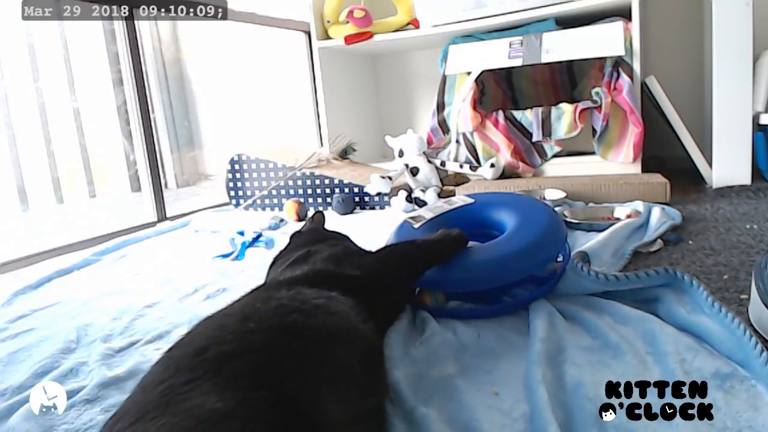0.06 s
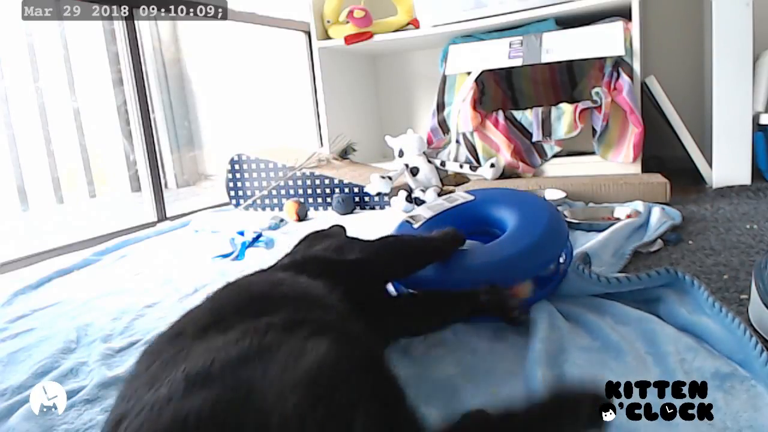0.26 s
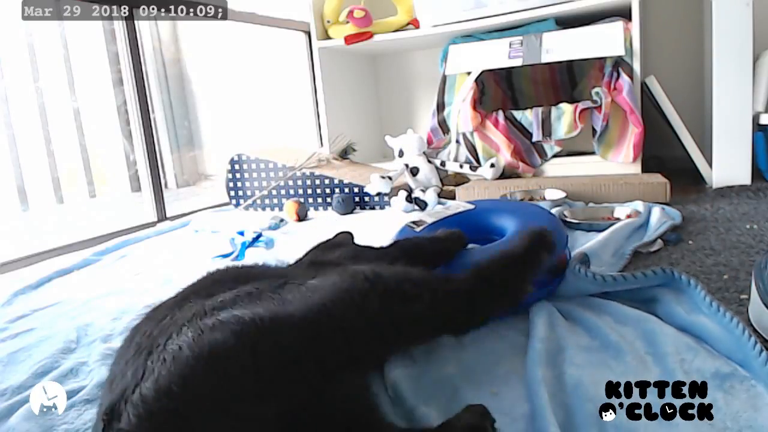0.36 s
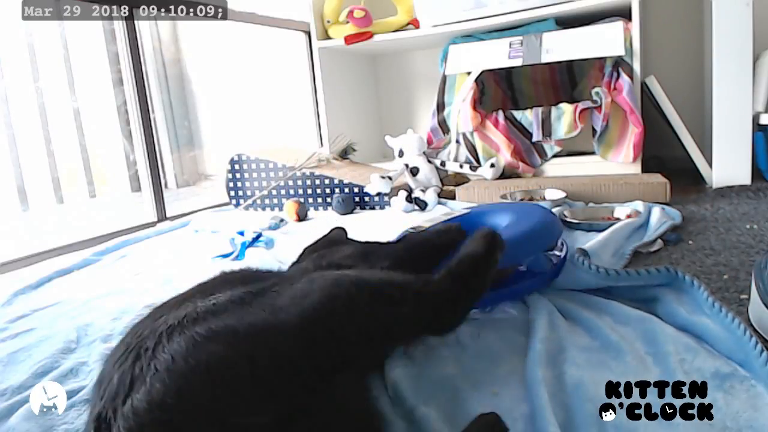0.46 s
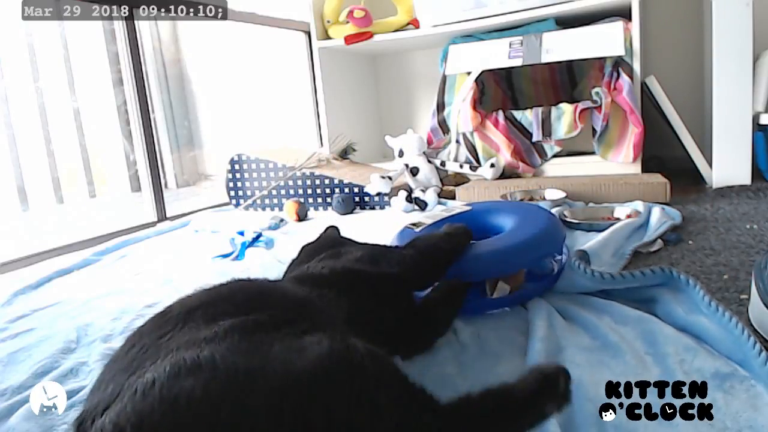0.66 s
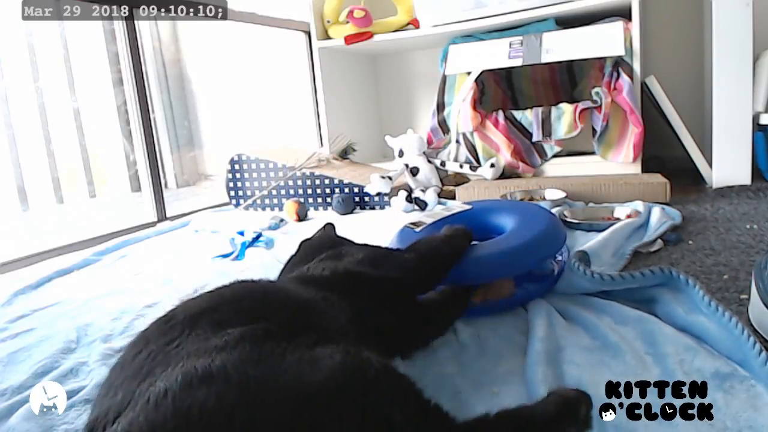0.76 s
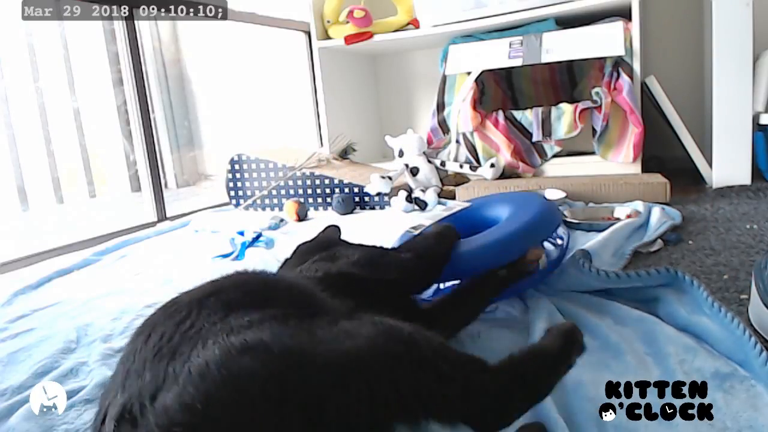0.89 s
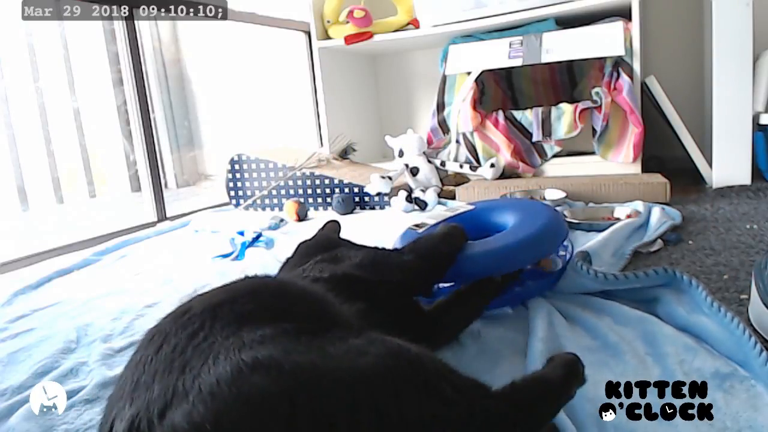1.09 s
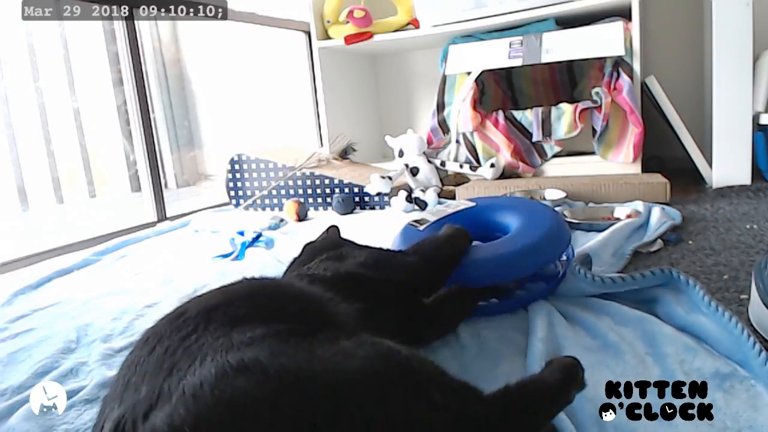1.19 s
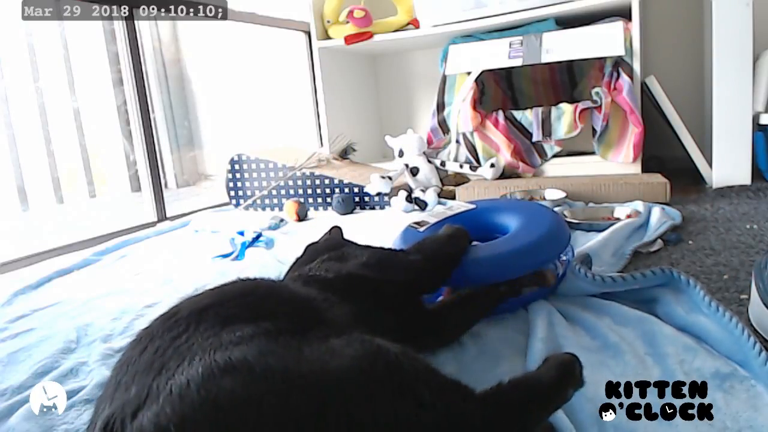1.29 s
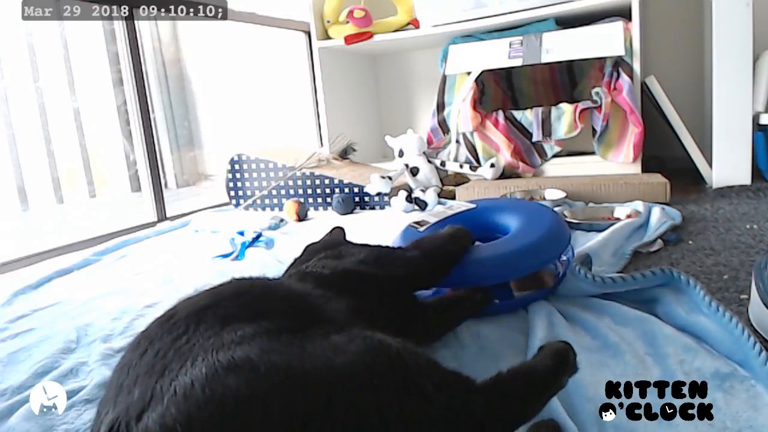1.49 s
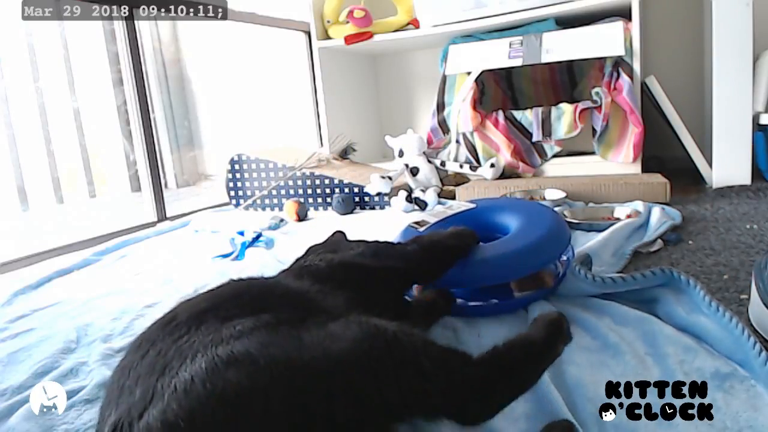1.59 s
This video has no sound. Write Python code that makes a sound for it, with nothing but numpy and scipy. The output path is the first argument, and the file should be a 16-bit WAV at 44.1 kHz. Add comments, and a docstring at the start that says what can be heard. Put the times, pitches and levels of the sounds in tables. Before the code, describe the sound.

A cat paws a plastic track toy in a small room, making the ball roll, rattle and click between light hollow knocks. The clatter eases toward the end, sitting slightly to the right over faint hiss and hum.

```python
"""A small room, where a cat on a blanket bats a hollow plastic ring with a ball in its track.
The ball clicks against the track walls and rolls with a rumble and a rattle; paws thump the shell
and set it ringing, and the room answers with a short tail. Underneath lie hiss, a machine's hum
and a thin whine from the wiring. All but the whine is louder on the right."""
import sys
import numpy as np
from scipy import signal
from scipy.fft import rfft, irfft, next_fast_len
from scipy.io import wavfile
from scipy.ndimage import uniform_filter1d, map_coordinates

SR = 44100
rng = np.random.default_rng(int(sys.argv[2]) if len(sys.argv) > 2 else 0)


def transcribe(signal):
    """Save signal, clipped to [-1, 1], as a 16-bit WAV file at the path in sys.argv[1]."""
    frames = np.atleast_2d(signal).T
    limited = np.clip(frames, -1, 1)
    pcm = np.round(limited * 32767).astype(np.int16)
    wavfile.write(sys.argv[1], SR, pcm)


N = 72765
TIME_S = np.arange(N) / SR


def amp(db):
    return 10 ** (np.asarray(db) / 20)


def unit_rms(x):
    return x / np.sqrt(np.mean(x ** 2) + 1e-20)


def curve_at(points, hz):
    """Read (freq_hz, value) breakpoints on a log frequency axis."""
    freqs, values = np.transpose(points)
    return np.interp(np.log(hz + 1), np.log(freqs + 1), values)


def fader(points):
    """Gain ride through (time_s, gain_db) breakpoints."""
    return amp(np.interp(TIME_S, *np.transpose(points)))


def wobble(rate_hz):
    """Smooth random modulation."""
    knots = rng.standard_normal(int(N * rate_hz / SR) + 4)
    return map_coordinates(knots, [TIME_S * rate_hz])


def filtered(x, response):
    """EQ x with a gain given as a function of frequency."""
    size = next_fast_len(x.shape[-1] + SR // 4)
    hz = np.fft.rfftfreq(size, 1 / SR)
    return irfft(rfft(x, size) * response(hz), size)[..., :x.shape[-1]]


def pings(start_s, hz, db, t60_s, rise_s, size):
    """Damped sines with soft attacks, each size samples long, mixed onto one track."""
    t = np.arange(size) / SR
    start_s, hz, db, t60_s, rise_s = (
        np.reshape(v, (-1, 1)) for v in np.broadcast_arrays(start_s, hz, db, t60_s, rise_s))
    attack = 1 - np.exp(-(t / rise_s) ** 2)
    waves = amp(db - 60 * t / t60_s) * attack * np.sin(2 * np.pi * hz * t)
    samples = np.round(start_s * SR).astype(int) + np.arange(size)
    return np.bincount(samples.ravel(), waves.ravel(), N + size)[:N]


def struck(start_s, db, centre_hz, width_octaves, modes, rise_s, size):
    """Hits on a body: the modes near each hit's centre ring, a little differently every time."""
    hz, mode_db, t60_s = np.transpose(modes)
    level_jitter, time_jitter = rng.standard_normal((len(start_s), 2, len(hz))).swapaxes(0, 1)
    off_centre = np.log2(hz / centre_hz[:, None]) / np.reshape(width_octaves, (-1, 1))
    level_db = db[:, None] + mode_db - 6 * off_centre ** 2 + 2 * level_jitter
    onset_s = start_s[:, None] + np.abs(time_jitter) / (3 * hz)
    return pings(onset_s, hz, level_db, t60_s, rise_s, size)


# Stereo image of diffuse sound: freq_hz, left_right_correlation
DIFFUSE_IMAGE = [(100, 0.89), (700, 0.92), (1500, 0), (3000, 0), (8000, 0)]


def diffuse(pair):
    """Mix two unrelated signals as mid and side: narrow lows, wide highs."""
    def mid_side_gains(hz):
        angle = np.arccos(curve_at(DIFFUSE_IMAGE, hz)) / 2
        return np.array([np.cos(angle), np.sin(angle)])
    mid, side = filtered(pair, mid_side_gains)
    return np.array([mid + side, mid - side])


# Tone of the noise bed: freq_hz, relative_db
HISS_EQ = [(12, -39), (20, -12.5), (66, 0), (107, -7), (280, -13.5), (361, -17.5), (792, -19), (4800, -37),
           (5590, -37), (7970, -38.5), (8600, -45), (11200, -84.5), (18900, -120)]


def hiss():
    """A soft, bass-heavy noise bed whose level flutters slightly."""
    noise = filtered(rng.standard_normal((2, N)), lambda hz: amp(curve_at(HISS_EQ, hz)))
    return amp(-54.5 + wobble(rate_hz=9.3)) * unit_rms(diffuse(noise))


# Low partials of the hum: harmonic_number, relative_db
HUM_PARTIALS = [(1, -55.5), (2, -66.5), (3, -67.5)]
# Swell of those partials: time_s, gain_db
HUM_SWELL = [(0, -1.5), (.15, 1), (.2, -6), (.3, 12), (.4, -0.5), (.55, 4), (.85, 2.5), (.9, 8.5),
             (1.051, 1), (1.2, 0.5), (1.399, 3.5), (1.55, -12), (1.65, 0)]
# Separate ride for the fifth harmonic: time_s, relative_db
FIFTH_SWELL = [(0, -64), (0.061, -66.5), (.15, -61), (.2, -66.5), (0.801, -67.5), (1, -68), (1.35, -66.5),
               (1.41, -66.5), (1.45, -58.5), (1.51, -57.5), (1.551, -73), (1.6, -54), (1.65, -63)]
HUM_HZ, HUM_DRIFT = 58.04, 0.0201


def machine_hum():
    """A machine's drone: harmonics that waver together in pitch, swelling and dipping."""
    pitch_hz = HUM_HZ * (1 + HUM_DRIFT * wobble(rate_hz=11))
    phase = 2 * np.pi * np.cumsum(pitch_hz) / SR
    lows = sum(amp(db + 4) * np.sin(harmonic * phase) for harmonic, db in HUM_PARTIALS)
    fifth = amp(3) * np.sin(5 * phase)
    return fader(HUM_SWELL) * lows + fader(FIFTH_SWELL) * fifth


# Whine tones, before the trim: pitch_hz, left_db, right_db, duty_fraction, alternate_accent_fraction
WHINE_TONES = [(5556.7, -71, -76, .95, 0), (6626.5, -85, -90, .95, 0), (8000, -80, -80, .42, .3)]
WHINE_TRIM_DB, CHOP_HZ, CHOP_OFFSET_S = 3, 59.4, 0.0265


def wiring_whine():
    """High tones picked up in the wiring, chopped into bursts of alternating polarity."""
    cycles = (TIME_S - CHOP_OFFSET_S) * CHOP_HZ
    polarity = 1 - 2 * (np.floor(cycles) % 2)
    whine = np.zeros((2, N))
    for hz, left_db, right_db, duty, accent in WHINE_TONES:
        gate = uniform_filter1d((polarity + accent) * (cycles % 1 < duty), size=60)
        whine += amp([[left_db], [right_db]]) * gate * np.sin(2 * np.pi * hz * TIME_S)
    return amp(WHINE_TRIM_DB) * whine


# Decay of the small room: freq_hz, t60_s
ROOM_DECAY = [(200, 0.24), (800, 0.28), (2000, 0.35), (5500, 0.32), (8000, 0.31)]
ROOM_DB, PREDELAY_S = -2.5, 0.005


def room_reverb(x):
    """Each frequency dies away at its own speed; every slice of time gets a fresh noise tail."""
    reverb = np.zeros((2, N))
    edges = np.linspace(0, N, num=24).astype(int)
    for start, end in zip(edges, edges[1:]):
        hz, t, noise = signal.stft(rng.standard_normal((2, SR // 2)), SR, nperseg=256)
        decay = amp(-60 * t / curve_at(ROOM_DECAY, hz)[:, None])
        _, tail = signal.istft(noise * decay, SR, nperseg=256)
        wet = signal.fftconvolve(x[None, start:end], tail / np.linalg.norm(tail[0]), axes=1)
        arrival = start + round(PREDELAY_S * SR)
        reverb[:, arrival:arrival + wet.shape[1]] += wet[:, :N - arrival]
    return amp(ROOM_DB) * diffuse(reverb)


# Modes of the hollow shell, shared by rumble and knocks: pitch_hz, gain_db, t60_s
SHELL_MODES = [(173.4, -0.5, 0.14), (291.3, -4, 0.11), (423.6, -9, 0.18), (499.7, -13.5, 0.14),
               (629, -4, 0.17), (657, -5.5, 0.19), (731.7, -7, 0.17), (809, -11, 0.22), (870.7, -9.5, 0.14),
               (916, -11, 0.063), (1033, -11.5, 0.085), (1167, -7.5, 0.067), (1298, -8, 0.14),
               (1546, -13.5, 0.048)]
LOW_CUT_HZ = 166


def shell_response(hz):
    """The plastic shell as a filter: resonances of alternating polarity behind a low cut."""
    body = 0
    for k, (mode_hz, db, t60_s) in enumerate(SHELL_MODES):
        damping = 4j * hz / t60_s
        body += (-1) ** k * amp(db) * damping / (mode_hz ** 2 - hz ** 2 + damping)
    return body * hz ** 2 / (hz ** 2 + LOW_CUT_HZ ** 2)


# Level rides as the toy drags and the ball rolls: time_s, rumble_db, rattle_db
ROLL_LEVELS = [(0.191, -86, -83), (0.212, -53.5, -52.5), (0.252, -55, -59), (0.275, -38.5, -45.5),
               (0.299, -46.5, -50), (0.339, -51, -73.5), (.4, -47.5, -50), (0.458, -60.5, -56),
               (.54, -50, -60), (0.561, -43, -54.5), (.65, -52, -49), (.72, -64.5, -79.5),
               (.82, -86.5, -74.5), (0.835, -53.5, -57), (0.855, -41, -47), (0.889, -46.5, -50.5),
               (0.998, -57.5, -62), (1.1, -65, -74), (1.2, -65.5, -61.5), (1.45, -84, -85.5),
               (1.52, -55, -74), (1.547, -52, -58.5), (1.581, -65.5, -80.5), (1.65, -51.5, -67)]
BUMPS_PER_S, TICKS_PER_S, MEAN_ACCENT_DB = 900, 3000, 2.4
TICK_HZ, TICK_LOG_SPREAD, TICK_T60_CYCLES = 4580, 1.33, 4.2


def ball_roll():
    """Random bumps rumble through the shell under a dense rattle of tiny ticks."""
    time_s, rumble_db, rattle_db = np.transpose(ROLL_LEVELS)
    triggers = rng.random(N) < BUMPS_PER_S / SR
    bumps = triggers * amp(MEAN_ACCENT_DB * rng.exponential(size=N)) * rng.standard_normal(N)
    rumble = filtered(bumps, shell_response)
    count = int(TICKS_PER_S * N / SR)
    hz = TICK_HZ * np.exp(TICK_LOG_SPREAD * (rng.random(count) - 0.5))
    start_s = rng.random(count) * N / SR
    accent_db = MEAN_ACCENT_DB * rng.exponential(size=count)
    rattle = pings(start_s, hz, accent_db, TICK_T60_CYCLES / hz, rise_s=0.000105, size=150)
    return sum(unit_rms(layer) * amp(np.interp(TIME_S, time_s, db, left=-120))
               for layer, db in [(rumble, rumble_db), (rattle, rattle_db)])


# Hits on the shell from paws, the floor and the ball's sharper clicks: start_s, relative_db, pitch_hz,
# thump_t60_s, ring_offset_db
SHELL_HITS = [(.2235, -43, 1330, 0.012, 3), (.2485, -31, 436, 0.0075, 6.5), (.2685, -19, 954, 0.0045, -14),
              (.271, -41, 74.6, 0.15, 4), (.272, -37, 181, 0.074, -15), (0.282, -36, 298, 0.072, -21),
              (.2755, -31, 656, 0.019, -11), (.2985, -39.5, 835, 0.011, -15),
              (.329, -43.5, 682, 0.056, -25), (.3592, -30.5, 1110, 0.0066, -18),
              (.377, -38.5, 95, 0.077, -18), (.3825, -26, 450, 0.0057, -14), (.4105, -32, 477, 0.0044, -10),
              (.413, -35.5, 176.3, 0.062, -5.5), (.454, -39, 1240, 0.022, 2),
              (.4635, -37, 1180, 0.009, -19.5), (.516, -31.5, 430, 0.0069, -3.5),
              (.5479, -30.5, 760, 0.012, -21), (.5503, -19.5, 855, 0.0056, -14),
              (.556, -35.5, 734.4, 0.09, -18.5), (.5755, -34.5, 776, 0.0066, -12),
              (.602, -41, 772, 0.025, -22), (.6158, -35, 1360, 0.004, -10),
              (.6405, -27, 860, 0.0048, -15.5), (.643, -42, 733, 0.098, -23),
              (.694, -37.5, 696, 0.0078, -29), (.8305, -41.5, 1270, 0.024, 5.5),
              (.8613, -17, 734, 0.0032, -25.5), (.864, -38, 201, 0.03, -8), (.872, -38.5, 885, 0.05, -4.5),
              (.954, -38.5, 417, 0.012, -8), (1.2085, -36, 1200, 0.0062, -12),
              (1.532, -56, 1310, 0.018, 11), (1.541, -43, 1220, 0.012, -0.5), (1.585, -48, 420, 0.022, -5),
              (1.63, -54, 980, 0.01, -2)]
THUMP_RISE_CYCLES = 0.17


def shell_knocks():
    """A short thump, then the shell's modes near its pitch bloom and ring out."""
    start_s, db, hz, t60_s, ring_db = np.transpose(SHELL_HITS)
    ring = struck(start_s, db + ring_db, hz, width_octaves=0.5,
                  modes=SHELL_MODES, rise_s=0.0027, size=5000)
    thump = pings(start_s, hz, db + 6, t60_s, rise_s=THUMP_RISE_CYCLES / hz, size=4000)
    return ring - thump


# Bright, short modes of the ball: pitch_hz, gain_db, t60_s
BALL_MODES = [(1150, -16, 0.02), (2075, 0.5, 0.0062), (3210, 0.5, 0.0038), (3835, -2.5, 0.0044),
              (4775, 1, 0.0037), (5720, -3, 0.005), (6530, -6, 0.0061), (7060, -2, 0.0035)]
# Ball hits on the track wall: start_s, relative_db, centre_hz, width_octaves, rebound_offset_db
BALL_HITS = [(0.1882, -41.5, 3870, 0.69, -10), (0.2151, -26, 5230, 0.24, -26),
             (.3590, -13.5, 4500, 0.73, -25.5), (0.3637, -26, 4600, 0.79, -25), (0.3829, -26, 3010, 1, -4),
             (.468, -34.5, 5970, 0.44, -9), (.5499, -25.5, 3040, 1, -2), (.5552, -26.5, 2300, 0.99, -19.5),
             (0.5766, -29, 5600, 0.91, -8.5), (0.6158, -14.5, 4200, 0.55, -19),
             (.629, -35, 3980, 0.37, -14.5), (0.6414, -23.5, 3870, 0.39, -13.5),
             (.8087, -30.5, 4170, 0.74, -1), (0.8752, -24, 3540, .7, -4), (.911, -38, 6400, 0.53, -14),
             (0.9171, -30.5, 5640, 0.83, -14), (0.9347, -34.5, 4900, 0.8, -18), (.96, -35, 4000, 0.54, -27),
             (1.1441, -35.5, 4600, 0.69, -8), (1.153, -38.5, 4500, 0.9, -5.5),
             (1.193, -59.5, 5260, .6, -26), (1.2087, -24, 4630, 0.85, -3), (1.539, -54, 3500, 0.49, -24),
             (1.553, -44, 3400, 1, -13)]
REBOUND_S = 0.0031


def ball_clicks():
    """The ball snaps against the track wall, rings its modes and rebounds once."""
    start_s, db, centre_hz, width_octaves, rebound_db = np.transpose(BALL_HITS)
    return sum(struck(hit_s, hit_db, centre_hz, width_octaves, BALL_MODES, rise_s=0.00021, size=500)
               for hit_s, hit_db in [(start_s, db), (start_s + REBOUND_S, db + rebound_db)])


def scene():
    """The toy and its reverb over the bed of hum and hiss."""
    toy = ball_clicks() + shell_knocks() + ball_roll()
    return toy + room_reverb(toy) + machine_hum() + hiss()


# Microphone colour: freq_hz, gain_db
MIC_EQ = [(20, -3.5), (2000, -2), (2600, -5.5), (4000, -2), (6500, -1), (8000, -3.5), (8800, -18.5)]
RIGHT_OVER_LEFT_DB, LEFT_LAG_S, HIGH_CUT_HZ = 6, 0.00003, 8900


def record(dry):
    """A microphone whose right port is louder and earlier; the whine joins before the high cut."""
    side = np.array([[-0.5], [0.5]])  # left, right
    balance = amp(RIGHT_OVER_LEFT_DB * side)
    balance /= balance.mean()

    def microphone(hz):
        time_offset = np.exp(2j * np.pi * hz * LEFT_LAG_S * side)
        return balance * amp(curve_at(MIC_EQ, hz)) * time_offset
    heard = filtered(dry, microphone) + wiring_whine()
    return filtered(heard, lambda hz: hz < HIGH_CUT_HZ)


dry = scene()
out = record(dry)
transcribe(out)
```